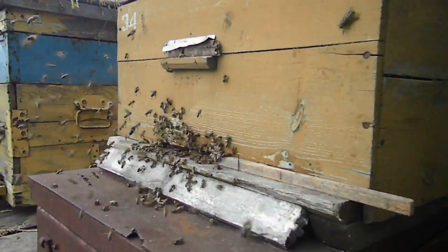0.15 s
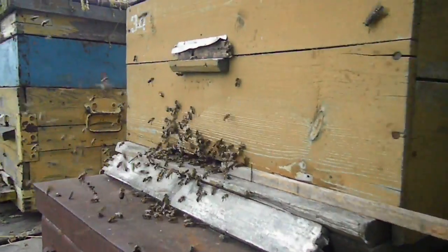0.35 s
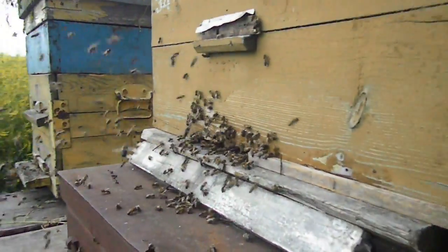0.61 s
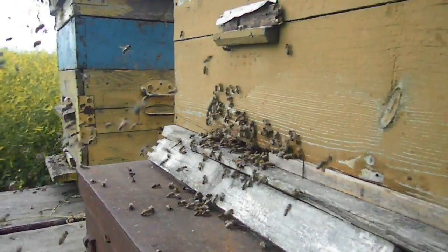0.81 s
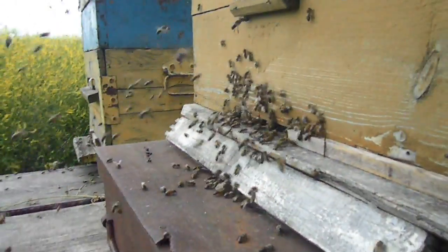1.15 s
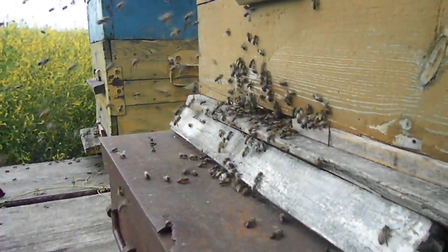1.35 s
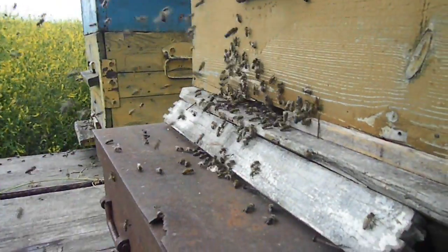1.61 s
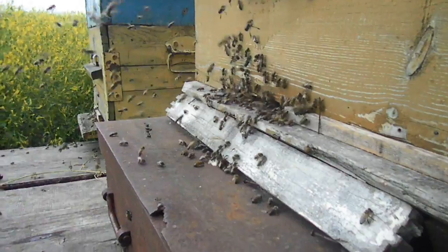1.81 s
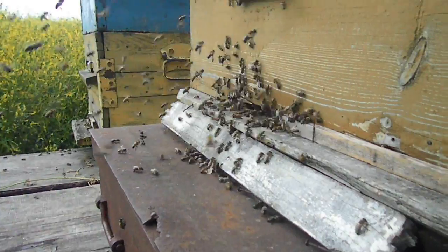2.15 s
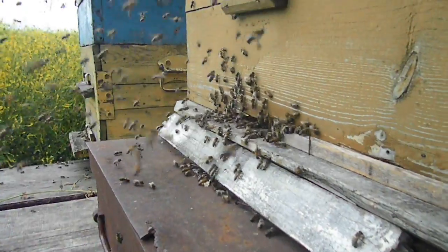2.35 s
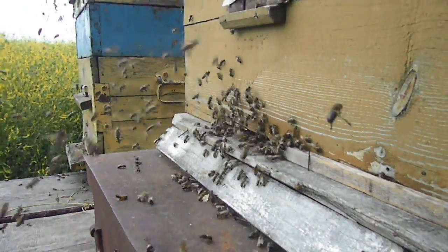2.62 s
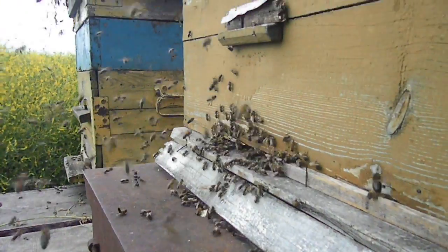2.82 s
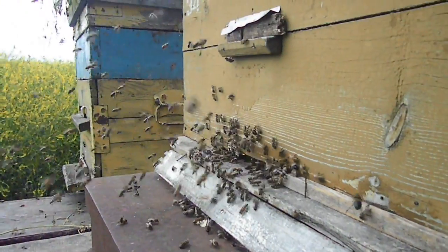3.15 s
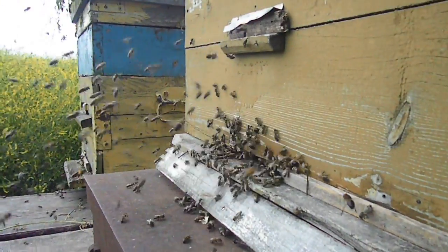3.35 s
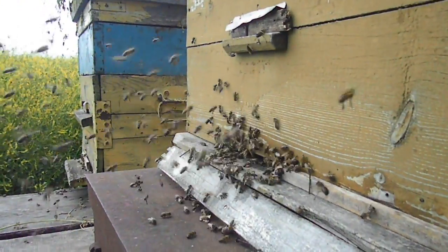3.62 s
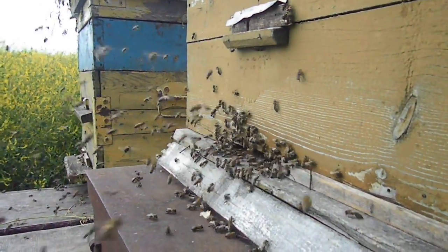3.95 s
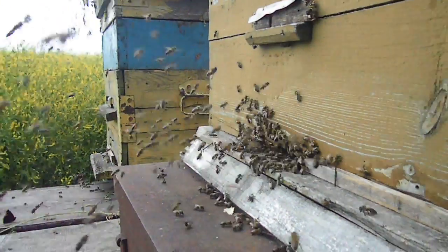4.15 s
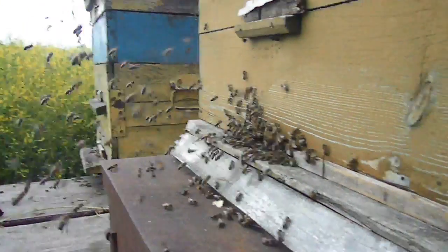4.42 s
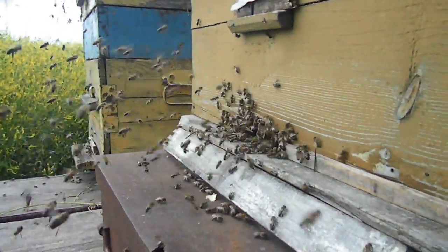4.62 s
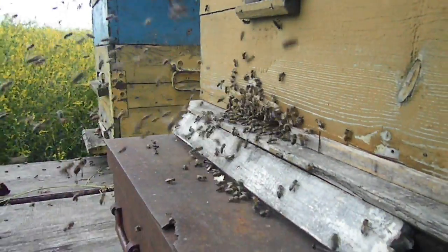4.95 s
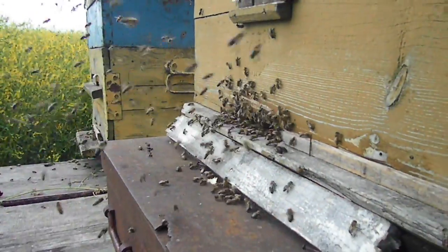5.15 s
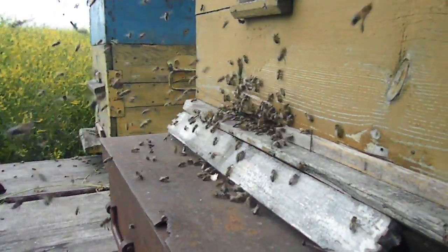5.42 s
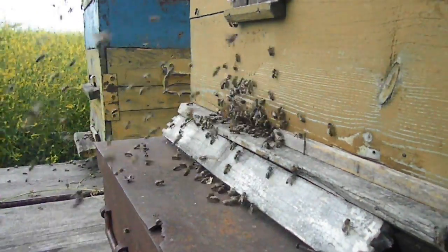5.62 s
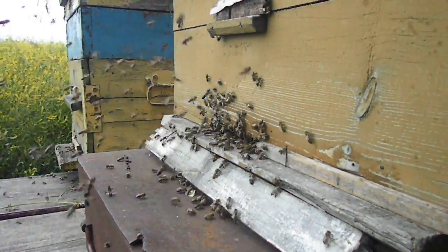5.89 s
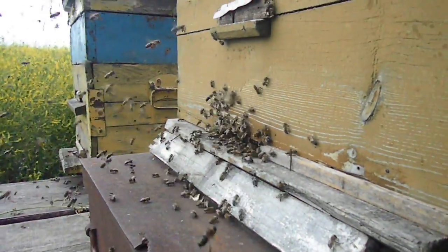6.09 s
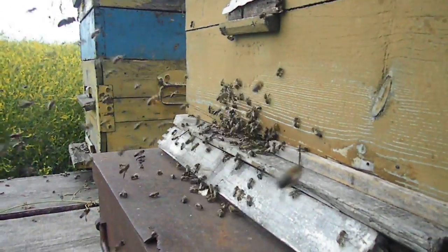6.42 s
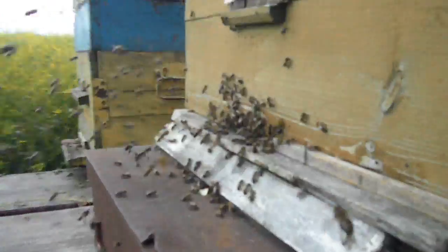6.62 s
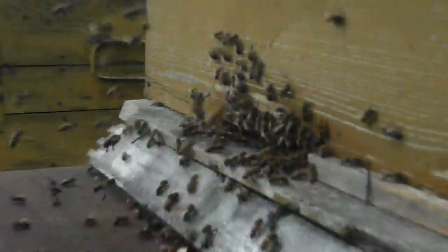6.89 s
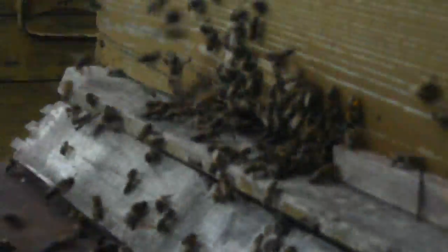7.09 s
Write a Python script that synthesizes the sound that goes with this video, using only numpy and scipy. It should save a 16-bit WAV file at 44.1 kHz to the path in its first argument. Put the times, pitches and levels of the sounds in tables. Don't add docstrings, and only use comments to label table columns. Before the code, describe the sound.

Dense honeybee hum fills the open air while single bees swell past the microphone, wind puffs thump low, and plastic ticks sharply.

```python
import sys
import numpy as np
from scipy import signal
from scipy.fft import rfft, irfft, next_fast_len
from scipy.io import wavfile
from scipy.ndimage import uniform_filter1d, map_coordinates

SR = 44100
rng = np.random.default_rng(int(sys.argv[2]) if len(sys.argv) > 2 else 0)


def wav_record(signal):
    frames = np.transpose(np.atleast_2d(signal))
    bounded = np.clip(frames, -1, 1)
    quanta = np.round(bounded * 32767).astype(np.int16)
    wavfile.write(sys.argv[1], SR, quanta)


def ratio(d):
    e = np.asarray(d, float) / 20
    return 10 ** e


N = 320166
STOP_S = 6.6558


def unit(x):
    return x / np.sqrt(np.mean(x ** 2) + 1e-20)


def along(points, hz):
    f, value = np.transpose(points)
    return np.interp(np.log(hz + 1), np.log(f + 1), value)


def over_time(points):
    return np.interp(np.arange(N) / SR, *np.transpose(points))


def wobbles(rate, count, size, sr):
    knots = rng.standard_normal((count, 200))
    at = np.arange(size) * rate / sr
    return np.array([map_coordinates(k, [at], order=2, mode="mirror") for k in knots])


def wobble(rate):
    return wobbles(rate, 1, N, SR)[0]


def filtered(x, response):
    size = next_fast_len(N + SR // 2)
    spectrum = rfft(x, size) * response(np.fft.rfftfreq(size, 1 / SR))
    return irfft(spectrum, size)[..., :N]


def rush(spectrum):
    return unit(filtered(rng.standard_normal(N), lambda hz: ratio(along(spectrum, hz))))


def add(out, s, wave):
    at = max(round(s * SR), 0)
    out[at:at + len(wave)] += wave[:len(out) - at]


# f/Hz, level/dB
OVERTONES = [(150, -1), (260, -1.5), (520, -0.5), (780, -4), (1000, -5), (1300, -4.5), (1600, -9.5),
             (2000, -19.5), (2600, -32.5)]


def hum(count, top_hz, slower_hz, drift, near_db, turn_db):
    thin, step = 7, 16
    sr, n = SR / thin, N // thin + 1

    def held(curves):
        return np.repeat(curves, step, axis=1)[:, :n]

    def slow(rate):
        return held(wobbles(rate, count, n // step + 1, sr / step))

    rank = (np.arange(count)[:, None] + .5) / count
    beat_hz = top_hz - slower_hz * rank ** 1.6
    beat_hz = beat_hz * (1 + drift * slow(2.5) + .015 * slow(25))
    phase = 2 * np.pi * (np.cumsum(beat_hz, axis=1) / sr + rng.random((count, 1)))
    distance_db = near_db * slow(7) - 4.0 * rank ** 2
    crowd = np.zeros(n)
    for k in range(1, 12):
        level_db = along(OVERTONES, k * beat_hz[:, ::step]) + distance_db[:, ::step]
        level_db = level_db + turn_db * wobbles(9, count, level_db.shape[1], sr / step)
        gain = uniform_filter1d(held(ratio(level_db)), size=step, axis=1)
        start = 2 * np.pi * rng.random((count, 1))
        crowd += np.sum(gain * np.sin(k * phase + start), axis=0)
    return unit(signal.resample_poly(crowd, thin, 1)[:N])


# t/s, hum level/dB
SWARM_LEVEL = [(0, -28.5), (.6, -27.5), (1.2, -26.5), (1.8, -26.5), (2.4, -26.5), (3, -25), (3.6, -25.5),
               (4.2, -25.5), (4.8, -25), (5.2, -26), (5.5, -25), (5.8, -26), (6.2, -26), (6.7, -27.5)]
# f/Hz, level/dB per Hz
WING_HISS = [(300, -120), (900, 6.5), (2000, 1), (3200, 1.5), (4600, 0), (5200, 0.5), (6100, 1.5),
             (7000, 0.5), (10000, 0), (13000, -1.5), (15000, -3), (17000, -10)]


def swarm():
    tones = hum(count=90, top_hz=271.16, slower_hz=92, drift=.035, near_db=3, turn_db=2.5)
    hiss_db = -5 + .5 * wobble(2.9) + 0.49 * wobble(26)
    return ratio(over_time(SWARM_LEVEL)) * (tones + ratio(hiss_db) * rush(WING_HISS))


# t/s, wing beat f/Hz, level/dB, heading as 2nd over 1st partial/dB
CLOSE_PASSES = [(0.28, 260, -30, 1), (0.679, 235, -27.5, -7), (0.809, 234, -27.5, -12), (1.01, 240, -28, 3),
                (1.05, 275, -28.5, 2), (1.309, 261, -30, -14), (1.911, 259.3, -23.5, -10),
                (2.39, 270, -25, 7), (2.44, 237, -21, -27.5), (2.64, 208.5, -25, -5.5),
                (3.299, 255, -25, -12), (3.432, 252, -25, -18), (3.6, 259, -29.5, -1),
                (3.72, 239, -28, -16), (3.811, 234.4, -24.5, -20), (4.089, 200.4, -30, -5.5),
                (4.35, 269, -26, -13), (4.43, 257, -26.5, 4), (4.76, 260, -27.5, -15),
                (4.89, 268, -28, 2.5), (5.03, 255, -27, -1), (5.269, 233, -28, -8), (5.38, 255, -25, 8),
                (5.841, 253, -32, -9), (6.08, 237, -25, -18), (6.18, 258, -27, -6), (6.261, 256, -26, -6.5),
                (6.34, 252, -26.5, 1.5), (6.56, 262, -29, -3), (6.639, 264, -29, -1.5)]


def passes():
    swell_s, third_db, third_scatter_db = 0.026, -13, 4.5
    out, t = np.zeros(N), np.arange(-SR // 8, SR // 8) / SR
    swell = np.exp(-.5 * (t / swell_s) ** 2)
    chance = rng.random((len(CLOSE_PASSES), 5))
    for (s, hz, db, heading_db), (slide, luck, *starts) in zip(CLOSE_PASSES, chance):
        first = db - max(heading_db, 0)
        second = db + min(heading_db, 0)
        third = db + third_db + third_scatter_db * (2 * luck - 1)
        phase = 2 * np.pi * hz * (t + 1.1 * (slide - .5) * t ** 2)
        tone = np.zeros(len(t))
        for k, level in enumerate([first, second, third]):
            tone += ratio(level - 2.5) * np.sin((k + 1) * phase + 2 * np.pi * starts[k])
        add(out, s - 1 / 8, tone * swell)
    return out


# t/s, 2nd partial f/Hz, its level/dB, 1st partial level/dB
NEAREST_BEE = [
    (0.05, 421.4, -32, -40),
    (0.088, 420, -26, -24),
    (0.108, 437, -25, -25),
    (0.146, 436, -30, -40),
    (0.17, 433, -40, -36),
]


def brush():
    s = np.transpose(NEAREST_BEE)[0]
    t = np.arange(N) / SR
    hz, second_db, first_db = [np.interp(t, s, c) for c in np.transpose(NEAREST_BEE)[1:]]
    phase = np.pi * np.cumsum(hz) / SR
    fade = np.clip(np.minimum(t - s[0], s[-1] - t) / 0.02, 0, 1)
    tone = ratio(first_db + 0.5) * np.sin(phase) + ratio(second_db) * np.sin(2 * phase)
    return fade * np.sqrt(2) * tone


# t/s, peak level/dB, length/s
STRONG_PUFFS = [(0.116, -21, 0.015), (0.16, -17, 0.016), (0.185, -16, 0.022), (0.448, -23, 0.017),
                (0.52, -26, 0.01), (0.548, -22, 0.008), (0.57, -12.5, 0.01), (0.666, -15.5, 0.0079),
                (0.698, -9, 0.004), (0.91, -20, 0.012), (1.022, -19.5, 0.019), (1.098, -21, 0.01),
                (1.128, -23, 0.01), (1.161, -13, 0.0094), (1.199, -20, 0.014), (1.255, -18, 0.013),
                (1.42, -18.5, 0.026), (1.459, -17, 0.013), (1.529, -20, 0.01), (1.615, -19, 0.01),
                (1.672, -22, 0.0085), (2.385, -18, 0.018), (2.503, -21.5, 0.011), (2.885, -29.5, 0.029),
                (3.623, -23, 0.013), (3.948, -16.5, 0.006), (4.25, -25, 0.009), (4.851, -25, 0.019),
                (4.938, -22, 0.012), (4.962, -17, 0.013)]
# t/s, peak level/dB
LIGHT_PUFFS = [(0.04, -29), (0.301, -26), (0.625, -28), (0.818, -28), (0.838, -28), (0.932, -24.5),
               (0.991, -30), (1.578, -28), (1.858, -33), (1.888, -30), (1.944, -30), (2.0, -32.5),
               (2.434, -31), (2.461, -31), (2.678, -25), (2.72, -30), (2.806, -30), (2.992, -31),
               (3.092, -34), (3.683, -31), (3.768, -26), (3.882, -32), (4.057, -36), (4.121, -36),
               (4.177, -34), (4.504, -35), (4.82, -27.5), (5.006, -32), (5.247, -38)]
# t/s, peak level/dB, f/Hz, length/s
GUST_FLAPS = [
    (2.5325, -12, 100, 0.013),
    (2.543, -3, 137, 0.013),
    (2.5505, -9, 249, 0.008),
    (2.557, -5, 190, 0.0058),
    (2.567, -17, 85, 0.014),
]
# t/s, level/dB
BREEZE_LEVEL = [(0, -49), (.63, -43.5), (.85, -52), (1.05, -47), (1.55, -47.5), (1.95, -49), (2.25, -55),
                (2.55, -42.5), (2.7, -49.5), (3.0, -48), (3.2, -64), (3.5, -52), (3.75, -49), (4.2, -48.5),
                (4.7, -65), (4.98, -53), (5.46, -64.5), (6.65, -65)]


def puffs():
    puff_hz, light_hz, light_s = 106, 95, 0.0119
    slot, size, pitch = rng.random((37, 3)).T
    s = (np.arange(len(slot)) + slot) * STOP_S / len(slot)
    db = np.interp(s, *np.transpose(BREEZE_LEVEL)) + 13 + 3.5 * (2 * size - 1)
    small = np.transpose([s, db, puff_hz * (.75 + .45 * pitch), .011 + 0 * s])
    strong = [(s, db, puff_hz, length) for s, db, length in STRONG_PUFFS]
    light = [(s, db, light_hz, light_s) for s, db in LIGHT_PUFFS]
    return strong + list(GUST_FLAPS) + light + list(small)


# f/Hz, level/dB per Hz
EDDY_COLOUR = [(20, -29.5), (45, 5.5), (100, 1), (200, -5.5), (350, -13.5), (600, -33), (900, -120)]


def wind():
    eddy_top_db = -15
    lead = SR // 8
    swings, eddies = np.zeros(N + lead), np.zeros(N + lead)
    t = np.arange(-SR // 8, SR // 8) / SR
    rows = puffs()
    for (s, db, hz, length), start in zip(rows, rng.random(len(rows))):
        swing = np.sin(2 * np.pi * (hz * t + .5 + 0.076 * (start - .5)))
        add(swings, s, ratio(db) * swing * np.exp(-.5 * (t / (0.28 * length)) ** 2))
        add(eddies, s, ratio(min(db, eddy_top_db) - 13) * np.exp(-.5 * (t / (1.25 * length)) ** 2))
    breeze = ratio(over_time(BREEZE_LEVEL) + 2.0 + 3.2 * wobble(8.4))
    blown = swings[lead:] + (eddies[lead:] + breeze) * rush(EDDY_COLOUR)
    return filtered(blown, lambda hz: hz ** 2 / (hz ** 2 + 42 ** 2))


# t/s, peak level/dB, ring f/Hz, crack over
# the ring/dB, t60/s
SHELL_TICKS = [(.481, -30, 12000, 6, 0.0028), (1.07, -29.5, 10970, 14, 0.0033),
               (4.187, -15, 5000, -3.5, 0.0034), (4.188, -17, 2940, -4, 0.0037),
               (4.5052, -21.5, 3000, -4, 0.0049), (5.239, -20.5, 3750, -6.5, 0.013),
               (5.256, -27, 3480, -7.5, .012), (5.27, -29.5, 3300, -7, .012),
               (5.4482, -16, 3200, -0.5, .004), (5.6124, -16.5, 2300, -12, .009),
               (5.618, -16, 2950, -11.5, 0.0082), (6.3505, -24, 3000, 5.5, .005),
               (6.3548, -10.5, 3400, -3, .004), (6.359, -15, 2700, -4.5, .008),
               (6.4677, -32, 5400, 3.5, .004), (6.6148, -16, 2700, -3, 0.0025),
               (6.6152, -14, 3700, -6, 0.003), (6.6156, -13, 4900, -7, .003)]
# f/Hz, level/dB, t60/s
SNAP_MODES = [
    (12100, -5, .005),
    (6000, -4, .0095),
    (7400, -7, .0065),
    (6040, -8, .008),
    (4600, -9, .008),
    (8800, -8, .006),
    (13500, -12, 0.0045),
]
# f/Hz, level/dB per Hz
CRACK_COLOUR = [(1000, -44), (2200, -5), (5000, -1), (9000, 0.5), (13000, -9), (15000, -18), (18000, -43)]


def shell():
    snap_s, spread_s, snap_crack_db = 6.3557, .002, -7
    out, t = np.zeros(N), np.arange(SR // 20) / SR
    blows = [(s, db, hz, db + crack_db, t60) for s, db, hz, crack_db, t60 in SHELL_TICKS]
    for k, (hz, db, t60) in enumerate(SNAP_MODES):
        strike_s = snap_s + spread_s * k / len(SNAP_MODES)
        blows.append((strike_s, db, hz, db + snap_crack_db, t60))
    noise = rush(CRACK_COLOUR)[:len(blows) * len(t)].reshape(len(blows), -1)
    for (s, db, hz, crack_db, t60), crack in zip(blows, noise):
        blow = ratio(db) * np.sin(2 * np.pi * hz * t) + ratio(crack_db) * crack
        add(out, s, blow * ratio(-60 * t / t60))
    return filtered(out, lambda hz: hz ** 2 / (hz ** 2 + 700 ** 2))


# f/Hz, level/dB per Hz
FIELD_RUMBLE = [(15, -120), (25, -22), (65, -13), (95, -4.5), (150, -4.5), (300, 2), (700, -16),
                (1200, -19), (2000, -120)]


def field():
    drone_hz = 97 * (1 + 0.037 * wobble(3.3))
    drone = ratio(-54.5 + 2.5 * wobble(4.5)) * np.sin(2 * np.pi * np.cumsum(drone_hz) / SR)
    return drone + ratio(-41.5 + 1.5 * wobble(8)) * rush(FIELD_RUMBLE)


# t/s, quick drop level/dB, its recovery/s, slow drop level/dB, its recovery/s
GAIN_DUCKS = [
    (2.55, 4.5, 0.035, 4.5, 1.38),
    (6.359, 10, 0.04, 5, .6),
]


def ducking():
    t, drop_db = np.arange(N) / SR, np.zeros(N)
    for s, quick_db, quick_s, slow_db, slow_s in GAIN_DUCKS:
        since = np.maximum(t - s, 0)
        recovery_db = quick_db * np.exp(-since / quick_s) + slow_db * np.exp(-since / slow_s)
        drop_db += (1 - np.exp(-since / 0.0033)) * recovery_db
    return ratio(-drop_db)


def scene():
    steady = (swarm() + field()) * ducking()
    return (steady + passes() + brush() + wind() + shell())[None]


def low_pass(x):
    return signal.sosfilt(signal.butter(12, 18070, fs=SR, output="sos"), x)


def record(dry):
    def notch(hz):
        return (7862 ** 2 - hz ** 2 + 40j * hz) / (7862 ** 2 - hz ** 2 + 750j * hz)

    x = filtered(dry, notch)
    x = x / (1 + np.abs(x / 1.05) ** 6) ** (1 / 6)
    x = filtered(x, lambda hz: hz < 17350)
    x = x * (np.arange(N) < STOP_S * SR)
    return low_pass(x)


dry = scene()
out = record(dry)
wav_record(out)
```